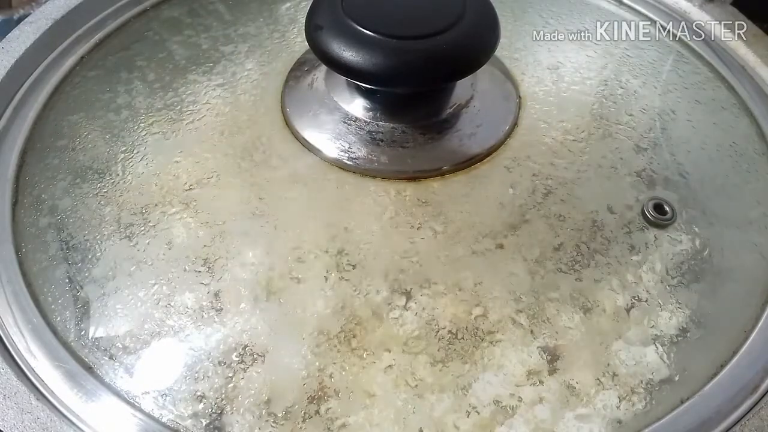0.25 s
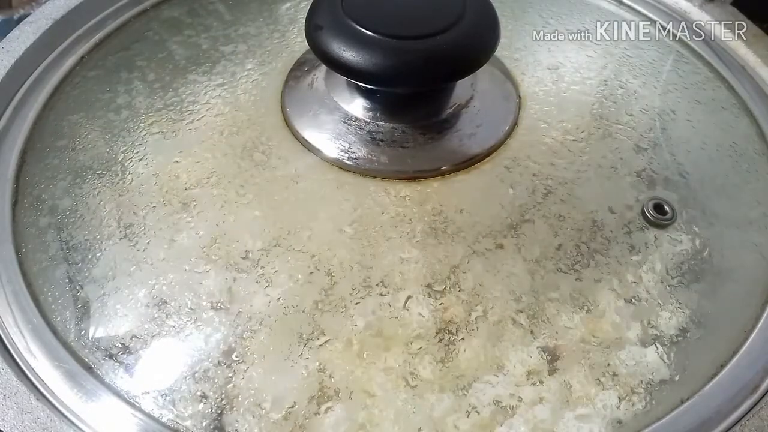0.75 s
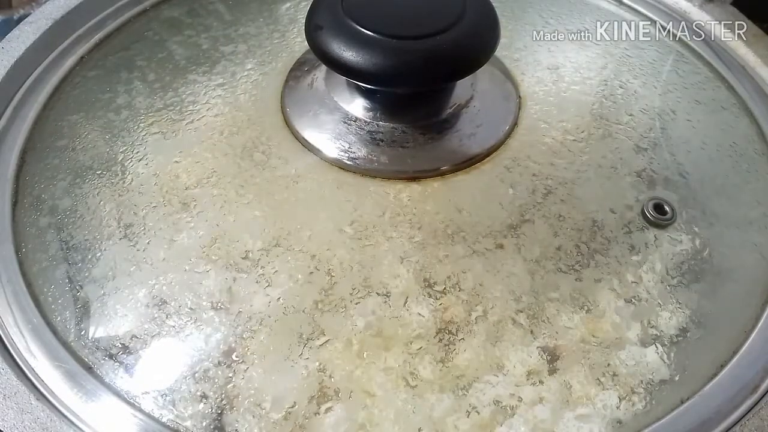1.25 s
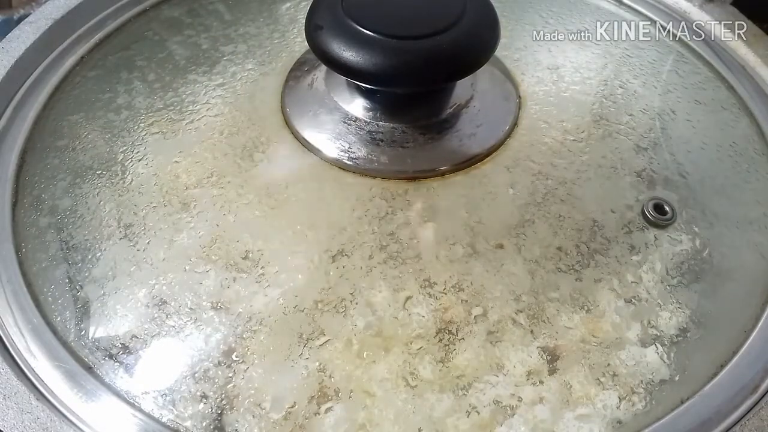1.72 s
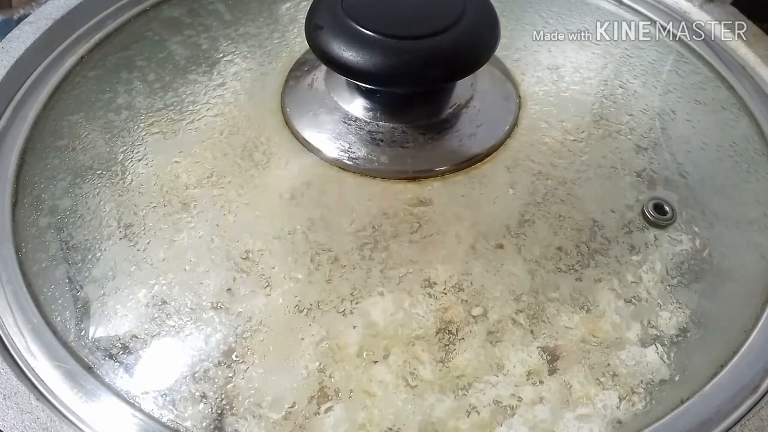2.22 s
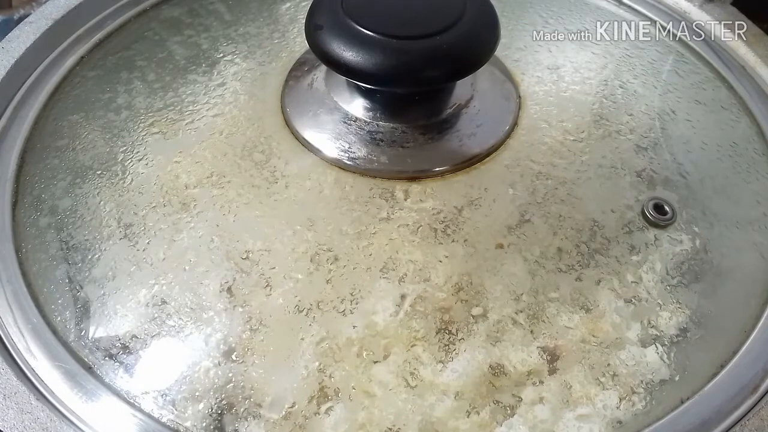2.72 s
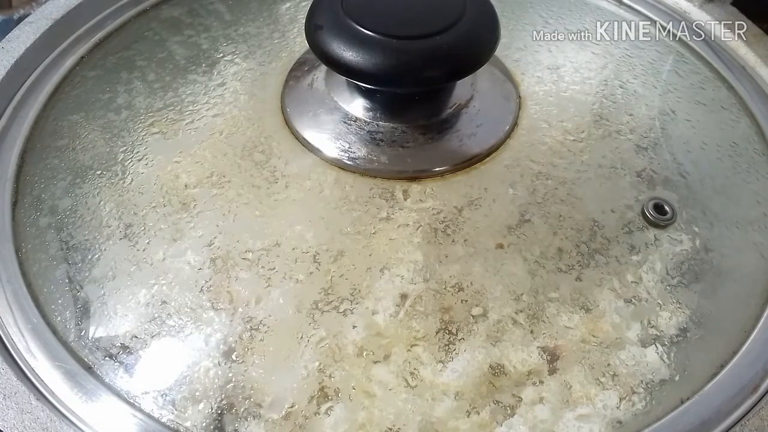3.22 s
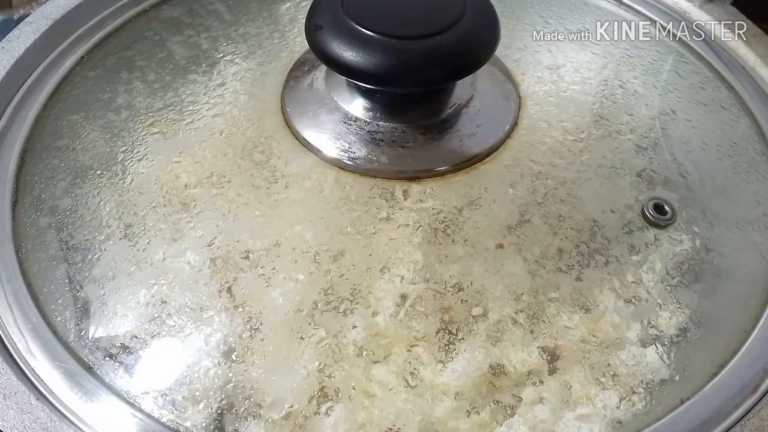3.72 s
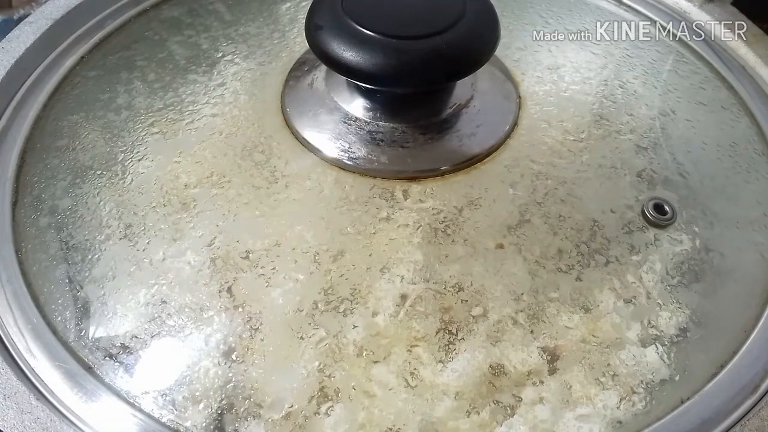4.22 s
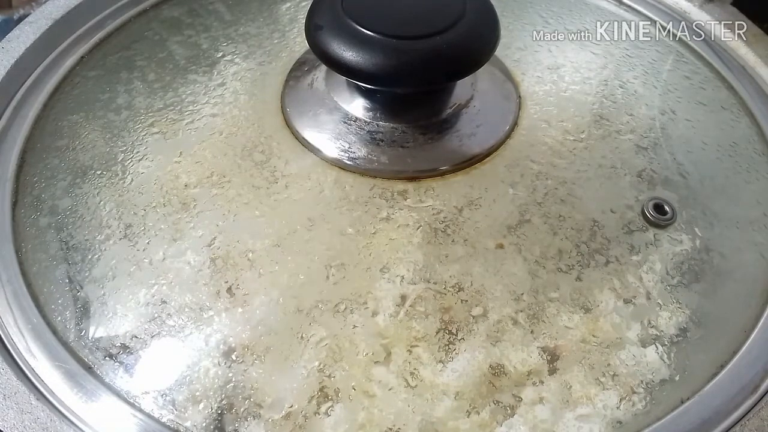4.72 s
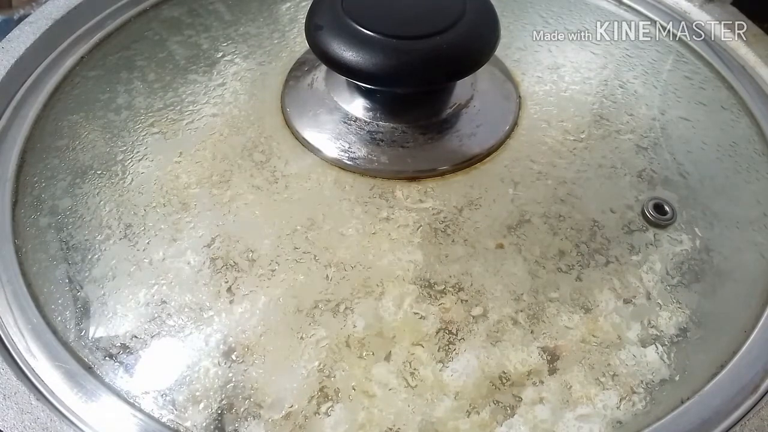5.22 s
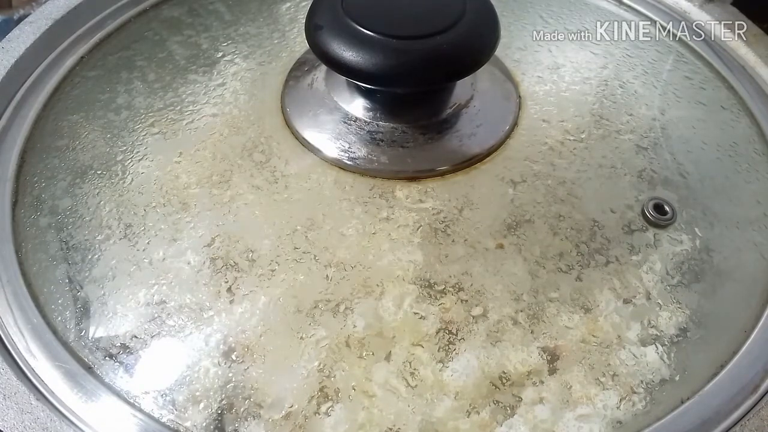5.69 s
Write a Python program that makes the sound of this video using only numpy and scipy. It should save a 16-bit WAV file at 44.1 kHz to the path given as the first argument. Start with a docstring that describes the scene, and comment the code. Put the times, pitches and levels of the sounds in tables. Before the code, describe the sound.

Popcorn kernels burst now and then with sharp bright cracks inside a lidded steel pot, over a steady quiet oil sizzle, close up.

```python
"""Popcorn pops now and then in a steel pot under a glass lid, close to the microphone in a small kitchen.
Each bursting hull is a short filtered noise, thrown back by a near surface; it kicks decaying pot modes
and a low thump. Flying kernels knock in the same way, mostly more softly. Hot oil sizzles as coloured noise
with ticking bubbles, steam puffs as swelling noise, and a low hum of two tones fades after half a second."""
import sys
import numpy as np
from scipy import signal
from scipy.io import wavfile

SR = 44100
rng = np.random.default_rng(int(sys.argv[2]) if len(sys.argv) > 2 else 0)


def to_wav(s):
    """Save 16-bit WAV."""
    ch = np.atleast_2d(s).T  # columns
    pcm = np.round(np.clip(ch, -1, 1) * 32767)  # PCM
    wavfile.write(sys.argv[1], SR, pcm.astype(np.int16))


N = 262395  # samples, just under six seconds

T = np.arange(SR // 2) / SR  # time axis of one blow or of the room's tail, s
BLOW_S = 0.022  # opening stretch of a blow over which its level is set, s

# Narrow, high resonances of the space under the lid. Each row: centre in Hz, width in Hz, level in dB.
LID_RESONANCES = [(7410, 24, 4), (8750, 47, -4), (8564, 220, 5.5), (9200, 140, 5.5), (9900, 29, 10),
                  (10460, 67, 1)]


def amp(db):
    """Decibels to gain."""
    return 10 ** (np.asarray(db) / 20)


def unit(x):
    """Scales to rms 1."""
    return x / np.sqrt(np.mean(x ** 2) + 1e-20)


def unit_blow(x):
    """Scales a blow so that its opening moments have rms 1."""
    opening = x[:round(BLOW_S * SR)]
    return x / np.sqrt(np.mean(opening ** 2) + 1e-20)


def read(points, hz):
    """Reads a table of (Hz, value) along a logarithmic frequency axis."""
    f, value = np.transpose(points)
    return np.interp(np.log(hz + 1), np.log(f + 1), value)


def add(mix, s, sound):
    """Adds a sound to the mix at time s, cut off at the end."""
    part = mix[max(round(s * SR), 0):][:len(sound)]
    part += sound[:len(part)]


def colour(x, db_at, size=4096):
    """Causal minimum-phase filter whose gain in dB is the function db_at(Hz)."""
    hz = abs(np.fft.fftfreq(size, 1 / SR))
    log_gain = np.log(amp(db_at(hz)))
    taps = np.fft.ifft(np.exp(np.conj(signal.hilbert(log_gain)))).real
    return signal.oaconvolve(x, taps[:size // 2])[:len(x)]


def peaks_db(peaks, hz):
    """Level of a set of bell-shaped resonances."""
    return sum(db / (1 + (2 * (hz - f) / width) ** 2) for f, width, db in peaks)


def high_pass(x, hz, order):
    """Cuts the bass below hz."""
    return signal.sosfilt(signal.butter(order, hz, "high", fs=SR, output="sos"), x)


def low_pass(x, hz, order):
    """Cuts the treble above hz."""
    return signal.sosfilt(signal.butter(order, hz, fs=SR, output="sos"), x)


def drift(length, per_s):
    """Random wandering: normal values, per_s of them each second, joined by straight lines."""
    at = np.arange(length) * per_s / SR
    return np.interp(at, np.arange(4096), rng.standard_normal(4096))


def pops():
    """Kernels burst, some in two stages, and kick the pot."""
    # Each row: start in seconds, hull crack in dB, pot ring in dB, thump in dB, top of the crack in dB.
    bursts = [(.0712, -17.5, -27.5, -47.5, 0), (.458, -30, -35.5, -34, -2), (.6277, -36.5, -45.5, -49.5, 0),
              (1.044, -22.5, -41, -53, 0), (1.0555, -22.5, -30, -39, 1), (1.7674, -27.5, -39.5, -48, 3.5),
              (2.26, -32, -42, -49, -5), (2.3175, -20.5, -28.5, -39.5, -4.5),
              (2.3796, -15.5, -34.5, -53, -0.5), (2.842, -36.5, -42, -52.5, -8),
              (4.6805, -25.5, -38.5, -45, 0.5), (4.9453, -20, -32, -57, -5.5),
              (4.9508, -19, -35.5, -43, -16)]
    bright_db = 1.5  # a burst always rings the pot brightly, dB per octave
    out = np.zeros(N)
    for s, crack_db, ring_db, thump_db, top_db in bursts:
        add(out, s, blow(crack_db, ring_db, thump_db, top_db, bright_db))
    return out


def blow(crack_db, ring_db, thump_db, top_db, bright_db, lowest_hz=125):
    """A kernel gives a crack, a clack and ring of the pot, and a thump of its base."""
    # Modes of the pot, its air and its lid. Each row: centre in Hz, level in dB, 60 dB decay in seconds.
    pot_modes = [(1079.5, -13, 0.1), (1183, -3, 0.078), (1221, -5.5, 0.037), (1325, -14, 0.061),
                 (1830, -9.5, 0.11), (2089, 0.5, 0.09), (2087, -0.5, 0.043), (2484, -8, 0.062),
                 (2670, -10, 0.076), (2748, -10, 0.071), (2820, -6, 0.1), (3497, -10.5, 0.11),
                 (3490, -20, 0.073), (4280, -17.5, 0.09), (4400, -16, 0.13), (4780, -11.5, 0.1),
                 (4980, -7, 0.052), (7350, -18, 0.069)]
    # Low modes of the pot on the stove. Each row: centre in Hz, level in dB, 60 dB decay in seconds.
    base_modes = [(160.3, -6.5, 0.2), (173, 1.5, 0.047), (221.5, -4.5, 0.052), (348.4, -1.5, 0.05),
                  (485, -12, 0.053), (706, -6.5, 0.024), (898, -10, 0.028)]
    ring_rise_s, thump_rise_s = 0.0022, 0.0013
    clack_db = -7.5  # against the ring

    ringing = unit_blow(ring(pot_modes, bright_db, ring_rise_s, scatter_db=4.0, detune=0.004))
    wall = ringing + amp(clack_db) * clack()
    base = ring(base_modes, 0, thump_rise_s, scatter_db=0.5, detune=0.011)
    base = high_pass(base, lowest_hz, order=4)  # a small pot radiates no deep bass
    return amp(crack_db) * crack(top_db) + amp(ring_db) * wall + amp(thump_db) * unit_blow(base)


def crack(top_db, scatter_db=-11, scatter_s=0.025, lumpy_db=4.5, flake_db=-4, flakes_per_s=110, flake_s=0.042):
    """The hull snaps; the sound scatters inside the pot while flakes tick against their neighbours."""
    # A splitting hull heard through the lid. Each row: frequency in Hz, relative level in dB per Hz.
    hull_spectrum = [(80, -58), (250, -30.5), (1500, -33.5), (3000, -23), (4600, -15), (5200, -12.5),
                     (6500, -10.5), (7600, -6), (8500, -2.5), (9800, -5.5), (11000, -13), (13000, -22),
                     (15400, -29)]
    snap_s = 0.0015  # decay time of the snap

    def spectrum_db(hz):
        top = read([(8700, 0), (11000, top_db)], hz)  # a faster snap reaches higher into the treble
        return read(hull_spectrum, hz) + peaks_db(LID_RESONANCES, hz) + top

    snap = np.exp(-T / snap_s)
    scatter = amp(scatter_db + lumpy_db * drift(len(T), 792)) * np.exp(-T / scatter_s)
    ticks = (rng.random(len(T)) < flakes_per_s / SR) * rng.random(len(T)) * np.exp(-T / flake_s)
    flakes = amp(flake_db) * signal.fftconvolve(ticks, snap)[:len(T)]
    # the three loudness curves add as powers and shape one noise
    loudness = np.sqrt(echoed(snap, 0.56) ** 2 + scatter ** 2 + flakes ** 2)
    return unit_blow(colour(loudness * rng.standard_normal(len(T)), spectrum_db))


def echoed(envelope, share):
    """Repeats a loudness curve as the reflection from a surface about a metre away."""
    echo_s = 0.0061  # there and back
    late = np.concatenate([np.zeros(round(echo_s * SR)), envelope])[:len(envelope)]
    return envelope + share * late


def ring(modes, bright_db, rise_s, scatter_db, detune, chatter_db=3.5):
    """Decaying modes, weighed anew each blow; brightness tilts them and the loose lid makes them chatter."""
    hz, db, t60 = np.transpose(modes)[:, :, None]
    weight, shift, phase = rng.standard_normal((len(modes), 3)).T[:, :, None]
    tilt_db = bright_db * np.log2(hz / hz[0])  # hard blows favour the high modes
    level = amp(db + tilt_db + scatter_db * weight - 60 * T / t60)
    tones = level * np.sin(2 * np.pi * (hz * (1 + detune * shift) * T + phase))
    rise = 1 - np.exp(-T / rise_s)
    return tones.sum(0) * rise * amp(chatter_db * drift(len(T), 248))


def clack():
    """The pot's many damped modes, merged to a short burst of coloured noise."""
    # Each row: frequency in Hz, relative level in dB per Hz.
    clack_spectrum = [(100, -14), (250, -5.5), (800, 1), (1600, -2.5), (3500, -0.5), (8000, -19)]
    decay_s = 0.021
    burst = rng.standard_normal(len(T)) * np.exp(-T / decay_s)
    return unit_blow(colour(burst, lambda hz: read(clack_spectrum, hz)))


def knocks():
    """Thrown kernels hit the wall or the lid; click and thump follow the strength of the ring."""
    # They land with hard hull or soft puffed side.
    # Each row: start in seconds, pot ring in dB, ring brightness in dB per octave.
    hits = [(.196, -45.5, 6), (.354, -42.5, -3), (.7, -56, 5), (.782, -44.5, -4), (1.259, -43, -8),
            (1.579, -41, 6), (2.113, -53.5, -3), (2.173, -46.5, -2), (3.159, -52.5, -12),
            (3.645, -58.5, -18), (3.739, -60, -23), (4.795, -48.5, -6), (5.115, -42, 1.5),
            (5.44, -56.5, -4), (5.584, -48, -12.5)]
    click_over_ring_db, click_top_db = 4, -4
    click_per_brightness = 0.17  # dB of click for each dB per octave
    middling_ring_db, middling_thump_db = -45.5, -52.5
    thump_growth = 0.3  # the thump grows more slowly than the ring, dB per dB
    out = np.zeros(N)
    for s, ring_db, bright_db in hits:
        click_db = ring_db + click_over_ring_db + click_per_brightness * bright_db
        thump_db = middling_thump_db + thump_growth * (ring_db - middling_ring_db)
        add(out, s, blow(click_db, ring_db, thump_db, click_top_db, bright_db))
    return out


def sizzle(flutter_db=0.25, swell_db=1.72, bubble_db=-11, bubbles_per_s=500, size_db=3.5):
    """Countless tiny bubbles merge to a hiss; larger ones tick; the space under the lid colours both."""
    # Broad spectrum of the frying under the lid. Each row: frequency in Hz, relative level in dB per Hz.
    frying_spectrum = [(25, -6), (55, -9.5), (92, 1.5), (130, -7), (380, -3), (650, -4.5), (1500, -8.5),
                       (2100, -4), (2700, -12), (5200, -15.5), (7400, -9.5), (8500, -2), (11200, -10),
                       (15400, -15)]
    # Resonances of the frying. Each row: centre in Hz, width in Hz, level above the broad spectrum in dB.
    frying_resonances = [(101.5, 15, 6), (153.4, 18, 11.2), (449, 39, 3.8), (1120, 23, 2), (1740, 92, 3.7),
                         (2330, 26, 12.1), (4064, 262, 17.3), (4710, 27, 17), (5820, 620, 12.2),
                         (6660, 53, 10.4), (8810, 260, 4.6), (8150, 325, 6.9), (10200, 670, 8),
                         (12500, 640, 4)]
    sizzle_db = -44.5

    def spectrum_db(hz):
        resonances = peaks_db(frying_resonances, hz) + peaks_db(LID_RESONANCES, hz)
        return read(frying_spectrum, hz) + resonances

    wash = rng.standard_normal(N) * amp(flutter_db * drift(N, 45) + swell_db * drift(N, 3.53))
    sizes = amp(size_db * np.minimum(rng.exponential(1, N), 4)) * rng.choice([-1, 1], N)
    bubbles = sizes * (rng.random(N) < bubbles_per_s / SR)
    frying = wash + amp(bubble_db) * unit(bubbles)
    return amp(sizzle_db) * unit(colour(frying, spectrum_db))


def steam(sputter_db=0.5, gurgle_db=5.5):
    """Steam swells and dies away: a sputtering hiss above a hollow, gurgling rush, and a few thin spurts."""
    # Each row: peak in seconds, length in seconds, hiss in dB, hollow body in dB, body centre in Hz.
    puffs = [(1.577, 0.13, -32, -46, 754), (1.763, 0.2, -47.5, -48.5, 505), (3.077, 0.16, -67, -51.5, 378),
             (3.633, 0.044, -55, -47.5, 455), (4.534, 0.036, -69, -50, 826), (4.623, 0.21, -37, -50, 500),
             (4.944, 0.19, -47, -49.5, 438)]
    # Thin spurts that follow some pops. Each row: peak in seconds, length in seconds, level in dB.
    spurts = [(0.117, .018, -35.5), (0.468, .11, -44.5), (2.465, .02, -44), (4.756, .02, -42.5)]
    # Spectrum of the hiss. Each row: frequency in Hz, relative level in dB per Hz.
    hiss_spectrum = [(1500, -10), (3500, -19), (7000, -9), (9000, 7.5), (10000, 0), (11500, -10),
                     (15400, -19)]
    spurt_hz, spurt_octaves = 2600, 0.25
    puff_octaves_per_s = 2.4  # longer puffs have a broader body

    hiss = unit(colour(rng.standard_normal(N), lambda hz: read(hiss_spectrum, hz)))
    hiss = hiss * amp(sputter_db * drift(N, 230))
    rush = rng.standard_normal(N) * amp(gurgle_db * drift(N, 130))
    spurting = sum(amp(db) * flow(s, length_s) for s, length_s, db in spurts)
    out = through_gap(rush, spurt_hz, spurt_octaves) * spurting
    for s, length_s, hiss_db, body_db, body_hz in puffs:
        body = through_gap(rush, body_hz, puff_octaves_per_s * length_s)
        out += flow(s, length_s) * (amp(hiss_db) * hiss + amp(body_db) * body)
    return out


def flow(peak_s, length_s):
    """A bell-shaped swell of steam that rises faster than it falls."""
    rise_share = 0.34  # part of the length spent swelling
    t = np.arange(N) / SR - peak_s
    side_s = length_s * np.where(t < 0, rise_share, 1 - rise_share)
    return np.exp(-(t / side_s) ** 2)


def through_gap(rush, centre_hz, octaves, skirt_db=9):
    """The gap that the steam passes gives the rush one broad resonance."""
    def gap_db(hz):
        distance = np.log2((hz + 1) / centre_hz) / octaves
        return -skirt_db * np.minimum(np.hypot(1, distance), 10)

    return unit(colour(rush, gap_db))


def hum(overtone_db=-14, flutter_db=4):
    """A low steady tone with a wavering one above it; both hold, then fade."""
    low_hz, upper_centre_hz = 85.2, 365
    waver, wavers_per_s = 0.035, 9.7  # waver as a share of the upper pitch
    hum_db, stop_s, fade_db_per_s = -48.5, 0.47, 113
    t = np.arange(N) / SR
    upper_hz = upper_centre_hz * (1 + waver * drift(N, wavers_per_s))
    low = np.sin(2 * np.pi * low_hz * t)
    upper = np.sin(2 * np.pi * np.cumsum(upper_hz) / SR) * amp(overtone_db + flutter_db * drift(N, 38))
    level = amp(hum_db - fade_db_per_s * np.maximum(t - stop_s, 0))
    return np.sqrt(2) * level * (low + upper)  # the root of two gives the low sine rms 1


def kitchen(x, build_s=0.0045):
    """A diffuse tail that builds up quickly, each band dying at its own speed."""
    # Each row: frequency in Hz, 60 dB decay in seconds.
    room_decay = [(130, 0.53), (400, 0.89), (2400, 0.5), (6000, 0.53), (9000, 0.4), (15000, 0.28)]
    hz, t, z = signal.stft(rng.standard_normal(len(T)), SR, nperseg=256)
    fading = z * amp(-60 * t / read(room_decay, hz)[:, None])
    tail = signal.istft(fading, SR, nperseg=256)[1][:len(T)]
    tail = tail * (1 - np.exp(-(T / build_s) ** 2))
    return signal.fftconvolve(x, tail / np.linalg.norm(tail))[:N]


def scene(room_db=-9, width_db=-26, wide_below_hz=900):
    """All comes from one spot; the room adds a trace of width to the low notes."""
    pot = pops() + knocks() + steam()
    mono = pot + amp(room_db) * kitchen(pot) + sizzle() + hum()
    side = amp(width_db) * low_pass(kitchen(mono), wide_below_hz, order=2)
    return np.array([mono + side, mono - side])


def record(dry, low_cut_hz=50):
    """Two unlike microphone ports; the recorder cuts deep bass, rounds off high peaks and limits the band."""
    port_hz, port_width_hz, port_db = 7950, 850, 7  # this resonance is stronger in the right port
    edge_hz = 15600  # upper limit of the band
    resonance = [(port_hz, port_width_hz, port_db / 2)]
    left = colour(dry[0], lambda hz: -peaks_db(resonance, hz))
    right = colour(dry[1], lambda hz: peaks_db(resonance, hz))
    thin = high_pass(np.array([left, right]), low_cut_hz, order=2)
    rounded = thin / (1 + (thin / 0.8) ** 4) ** 0.25  # never exceeds 0.8
    taps = signal.firwin(401, edge_hz, window=("kaiser", 8), fs=SR)
    return signal.oaconvolve(rounded, taps[None], "same")


dry = scene()
out = record(dry)
to_wav(out)
```